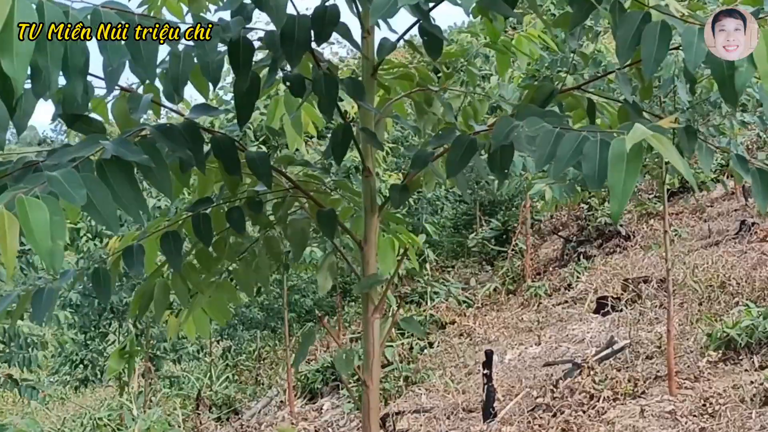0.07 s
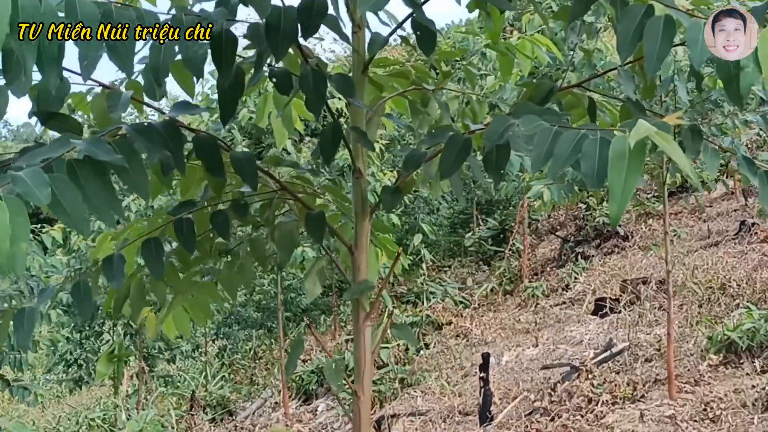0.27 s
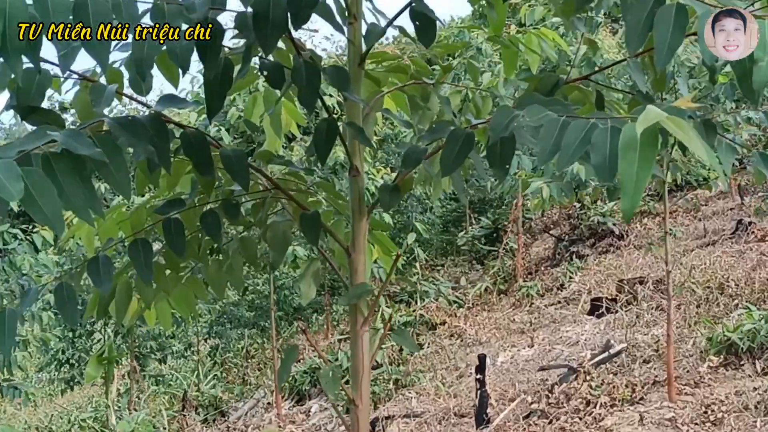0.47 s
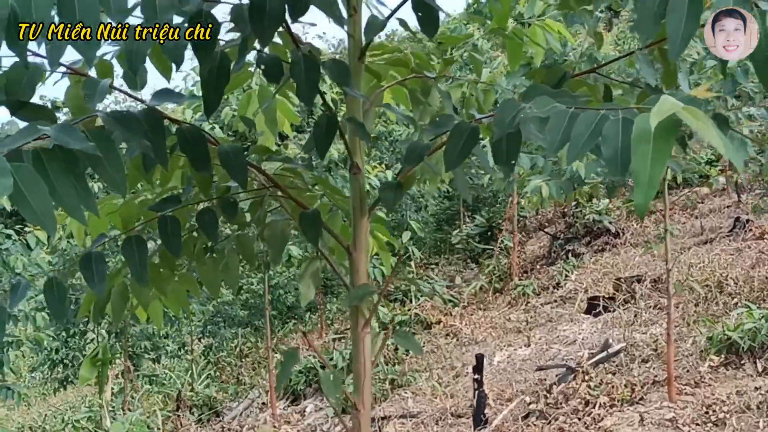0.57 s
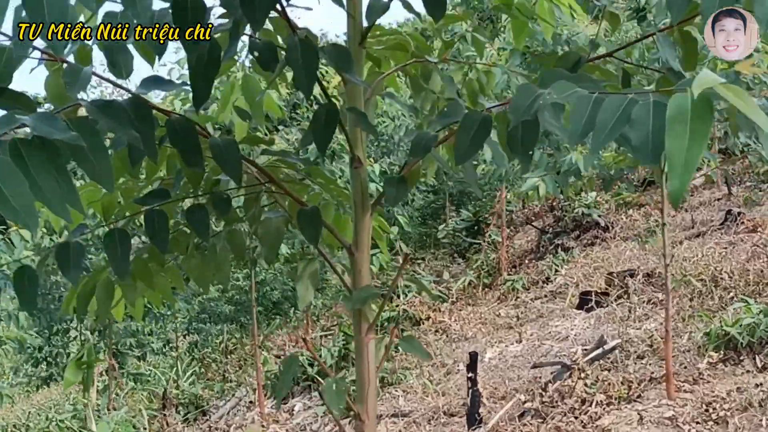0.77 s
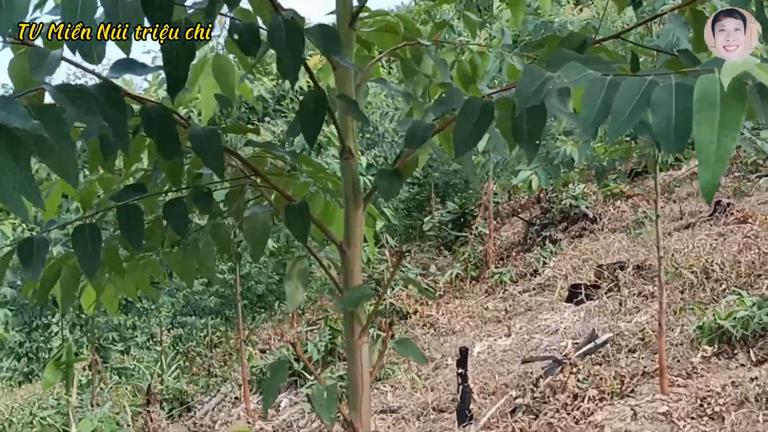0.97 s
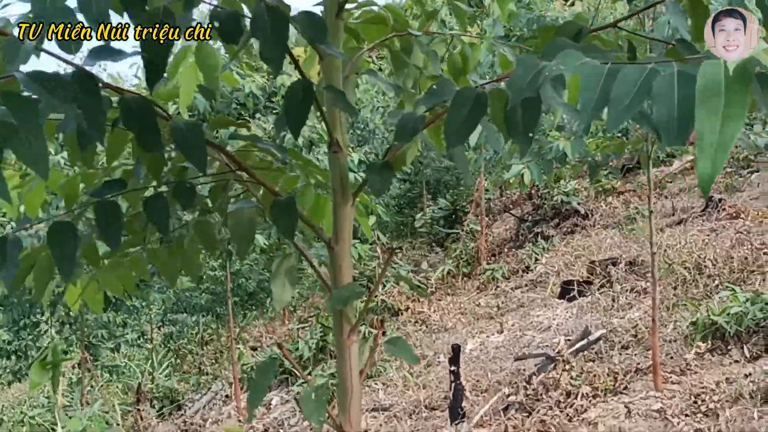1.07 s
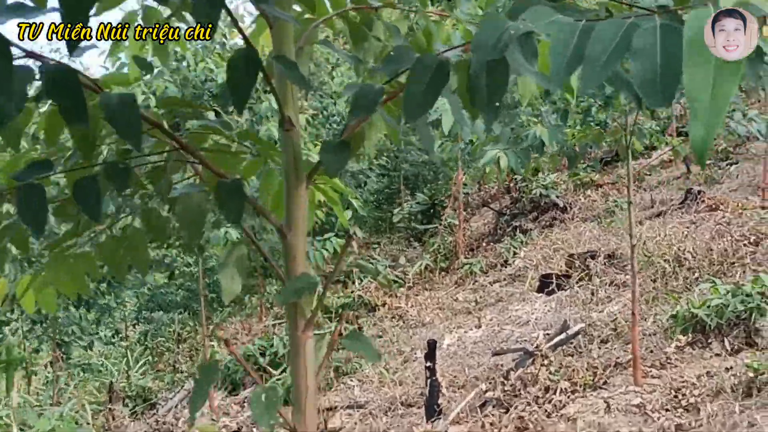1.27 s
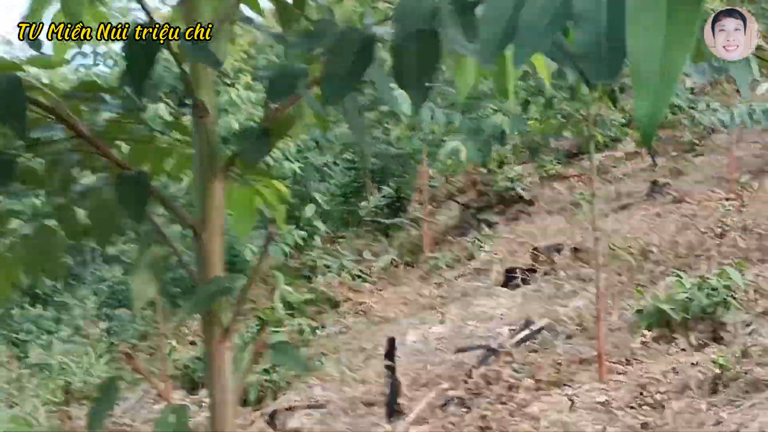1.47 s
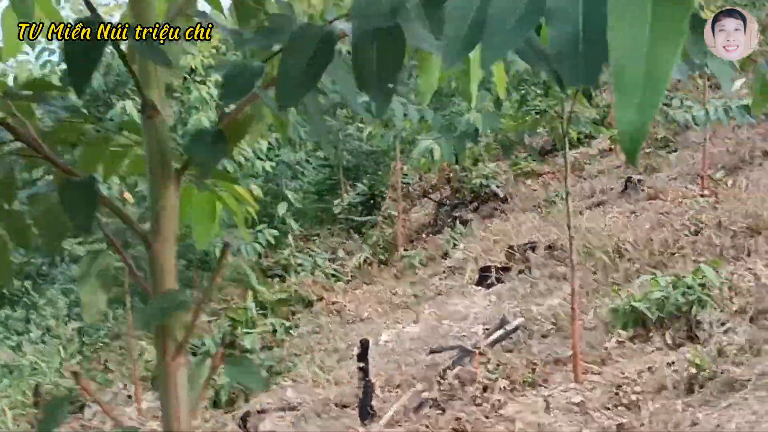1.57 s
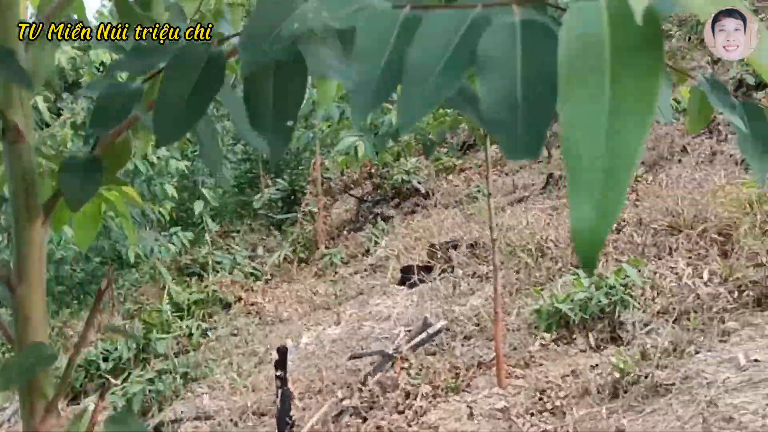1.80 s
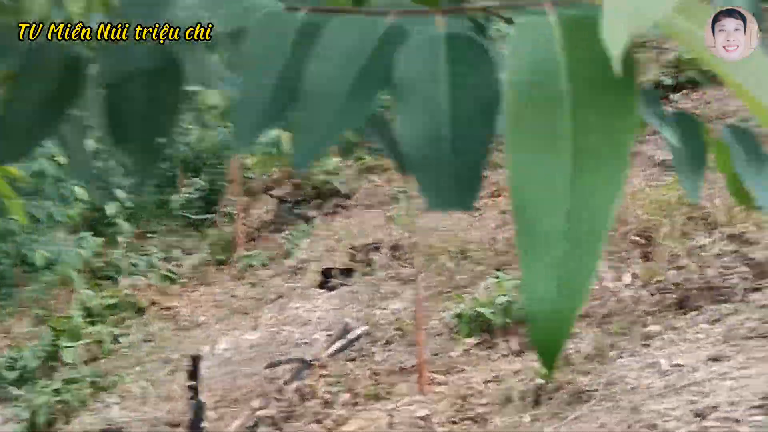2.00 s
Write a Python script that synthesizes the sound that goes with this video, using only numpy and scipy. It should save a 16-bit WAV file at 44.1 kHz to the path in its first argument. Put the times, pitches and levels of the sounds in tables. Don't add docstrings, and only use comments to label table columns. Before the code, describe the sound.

Crisp leaf litter crackles and thin twigs knock and snap under a slow step, close and loud; before it, only low wind buffeting on the microphone, faint air over leaves and far birdsong outdoors.

```python
import sys
import numpy as np
from scipy import signal
from scipy.fft import rfft, irfft, next_fast_len
from scipy.io import wavfile
from scipy.ndimage import uniform_filter1d, map_coordinates

SR = 44100
rng = np.random.default_rng(int(sys.argv[2]) if len(sys.argv) > 2 else 0)


def int16_out(signal):
    q = np.round(np.clip(np.atleast_2d(signal).T, -1, 1) * 32767)
    wavfile.write(sys.argv[1], SR, q.astype(np.int16))


def gain_from_db(level_db):
    decades = np.asarray(level_db, float) / 20
    return 10 ** decades


N = 90008


def unit(x):
    return x / np.sqrt(np.mean(x ** 2) + 1e-20)


def along(points, hz):
    f, v = np.transpose(points)
    return np.interp(np.log(hz + 1), np.log(f + 1), v)


def over_time(points):
    return np.interp(np.arange(N) / SR, *np.transpose(points))


def wobble(rate_hz):
    knots = rng.standard_normal(int(N * rate_hz / SR) + 4)
    return map_coordinates(knots, [np.arange(N) * rate_hz / SR])


def filtered(x, response):
    m = next_fast_len(len(x) + 8192)
    return irfft(rfft(x, m) * response(np.fft.rfftfreq(m, 1 / SR)), m)[:len(x)]


def resonance(hz, q):
    return lambda f: 1j * f * hz / q / (hz * hz - f * f + 1j * f * hz / q)


def high_pass(corner_hz, order):
    return lambda f: (1j * f / (corner_hz + 1j * f)) ** order


def add(out, start_s, x):
    i = round(start_s * SR)
    out[i:i + len(x)] += x[:len(out) - i]


def rings(table, crack_db, tail_db, rough, soft):
    out, t = np.zeros(N), np.arange(SR // 6) / SR
    for start_s, peak_db, hz, ms in table:
        crack_noise, tail_noise, drift_noise = rng.standard_normal((3, len(t)))
        u = t / (ms / 2000)
        drift = rough * np.cumsum(drift_noise) * np.sqrt(hz / SR)
        ring = (u * np.exp(1 - u)) ** soft * np.sin(2 * np.pi * hz * t + drift)
        crack = unit(filtered(crack_noise, resonance(1.12 * hz, 0.7)))
        crack = gain_from_db(crack_db) * u * np.exp(1 - 0.97 * u) * crack
        tail = unit(filtered(tail_noise, resonance(hz, 1.45)))
        tail = gain_from_db(tail_db - 8.0 * t / 0.00694) * tail
        add(out, start_s, gain_from_db(peak_db) * (ring + crack + tail))
    return out


# (t/s, level/dB)
BREEZE = [
    (0, 3.8),
    (.35, 0.7),
    (.65, 3),
    (.78, -1.5),
    (1.15, -0.1),
    (1.7, 1.5),
    (1.85, -1.5),
]


def breeze_db():
    return over_time(BREEZE)


# (f/Hz, level/dB)
AIR = [(20, 8), (100, -7.5), (250, -10), (420, -4), (800, -14.5), (5400, -14), (8000, -24.5),
       (14700, -20.5)]


def slope_hiss():
    z = signal.stft(rng.standard_normal(N + 512), nperseg=512)[2]
    patches = uniform_filter1d(rng.standard_normal(z.shape), 6, 0)
    patches = unit(uniform_filter1d(patches, 10, 1))
    hiss = signal.istft(z * gain_from_db(1.7 * patches), nperseg=512)[1][:N]
    hiss = unit(filtered(hiss, lambda f: gain_from_db(along(AIR, f))))
    sway_db = 0.6 * wobble(9.5)
    return gain_from_db(-57 + breeze_db() + sway_db) * hiss


def wind_rumble():
    rumble = unit(filtered(rng.standard_normal(N), lambda f: resonance(70.7, 1.1)(f) ** 2))
    lumps_db = 3.5 * wobble(11.9)
    return gain_from_db(-67.5 + breeze_db() + lumps_db) * rumble


# (t/s, peak level/dB, ring f/Hz, length/ms)
THUMPS = [(.29, -46, 49, 20), (.503, -44.5, 190, 8.8), (.61, -43, 96, 22), (.665, -41, 67, 33),
          (.714, -28.5, 79.7, 14.5), (.87, -43, 80, 9.5), (.925, -37, 96.4, 38), (.985, -43, 61.5, 31),
          (1.06, -37.5, 63.8, 43), (1.2, -48, 76, 40), (1.345, -38, 135, 17.5), (1.41, -42, 64, 20),
          (1.82, -50, 89.5, 43), (1.99, -45, 59.5, 22), (.775, -47.5, 70.4, 13), (1.175, -50.5, 120, 11),
          (1.862, -46.5, 148, 12), (1.9, -48.5, 81, 23)]


def wind_thumps():
    return rings(THUMPS, crack_db=-60, tail_db=-60, rough=0.67, soft=1.68)


# (t/s, level/dB, pitch f/Hz, length/ms)
NOTES = [(0.178, -56, 4464, 27), (.25, -61, 4230, 73), (0.291, -53, 4069, 52), (.348, -49, 3770, 29),
         (.382, -55, 3596, 25), (.415, -63, 3270, 50), (0.706, -56.5, 4400, 63), (.772, -63, 4250, 59),
         (.82, -56.5, 4050, 46), (0.876, -55, 3790, 30.1), (.908, -60.5, 3600, 39),
         (1.135, -62.5, 4170, 55)]


def bird():
    sag_hz_per_s, trill_hz, trill_depth = 2100, 95, 0.45
    echo_db, echo_t60_s = -5.5, 0.17
    out = np.zeros(N)
    for start_s, level_db, hz, ms in NOTES:
        t = np.arange(round(ms * SR / 1000)) / SR
        beat = (trill_hz * t) % 1
        shape = np.abs(np.sin(np.pi * t / t[-1])) ** 0.69
        shape = shape * (1 - trill_depth * np.cos(2 * np.pi * beat))
        pitch_hz = hz - sag_hz_per_s * (t - t[-1] / 2) + 420 * np.exp(-10 * beat)
        husk = 0.028 * np.cumsum(rng.standard_normal(len(t)))
        whistle = np.sin(2 * np.pi * np.cumsum(pitch_hz) / SR + husk)
        breath = unit(filtered(rng.standard_normal(len(t)), resonance(hz + 550, 7.3)))
        add(out, start_s, 1.3 * gain_from_db(level_db) * shape * (whistle + gain_from_db(-10) * breath))
    t = np.arange(SR // 3) / SR
    echo = rng.standard_normal(len(t)) * gain_from_db(-60 * t / echo_t60_s)
    return out + gain_from_db(echo_db) * signal.fftconvolve(out, echo / np.linalg.norm(echo))[:N]


def crackle(grain_share):
    grains_per_s, grain_db, ribs_per_s, rib_db = 850, 3.2, 350, -7
    out, flurry = np.zeros(N), gain_from_db(2.2 * wobble(220))
    for hz in np.geomspace(1200, 14500, num=16):
        hit, size, sign = rng.random((3, N))
        height = np.minimum((1 - size) ** (-grain_db / 20 * np.log(10)), 5)
        clicks = (hit < grains_per_s / SR) * height * np.sign(sign - 0.5)
        clumps = gain_from_db(2.5 * wobble(60))
        out += np.sqrt(hz) * unit(filtered(clicks * flurry * clumps, resonance(hz, 9)))
    ribs = (rng.random(N) < ribs_per_s / SR) * rng.standard_normal(N)
    grains = unit(unit(out) + gain_from_db(rib_db) * unit(ribs))
    return np.sqrt(grain_share) * grains + np.sqrt(1 - grain_share) * rng.standard_normal(N)


# (f/Hz, level/dB)
LITTER = [(200, -17), (900, -1.5), (2000, 0), (3000, -1), (4300, 4), (6700, 3.5), (9000, -1), (15500, 0)]
# (t/s, crackle level/dB, brightness/dB)
WEIGHT = [(1.194, -65, 5), (1.197, -34, 2.5), (1.225, -48.5, 15), (1.255, -39.5, 5), (1.3, -33, 4),
          (1.34, -32, 3), (1.4, -46.5, 12.5), (1.445, -35, 2.5), (1.5, -39.5, -1), (1.547, -27.5, -1.5),
          (1.618, -34.5, 2), (1.663, -50, 2), (1.703, -28.5, -4), (1.76, -34, 3.5), (1.86, -42.5, 1),
          (1.926, -47, -7), (1.945, -39.5, 5.5), (2.04, -38, 0.5)]


def litter_bed():
    s, level_db, bright_db = np.transpose(WEIGHT)
    t = np.arange(N) / SR
    bed = unit(filtered(crackle(0.78), lambda f: gain_from_db(along(LITTER, f))))
    high = filtered(bed, lambda f: 1 / (1 + (7500 / (f + 1)) ** 8))
    bed = bed + (gain_from_db(np.interp(t, s, bright_db)) - 1) * high
    uneven_db = 0.66 * wobble(140) + 0.83 * wobble(29.655)
    return gain_from_db(np.interp(t, s, level_db, left=-150) + uneven_db) * bed


# (t/s, level/dB, centre f/Hz, length/ms)
CRUSHES = [(.641, -41.5, 6840, 10.5), (1.94, -51, 2160, 37), (1.212, -30, 12000, 10),
           (1.214, -30, 5570, 16), (1.408, -40.5, 1550, 47), (1.301, -36, 7800, 8.2),
           (1.311, -38, 12000, 3.8), (1.325, -26, 6500, 6.9), (1.348, -25, 4400, 33),
           (1.389, -23.5, 4600, 5.5), (1.449, -23, 6100, 4.6), (1.459, -22.5, 4230, 4.4),
           (1.476, -32, 5900, 11), (1.512, -34.5, 494, 37), (1.697, -21, 5750, 6.3), (1.716, -33, 5950, 10),
           (1.868, -31.5, 6540, 25), (1.872, -27.5, 14300, 25), (1.835, -27.5, 15000, 12.4),
           (.6, -56, 490, 51), (.85, -61, 430, 230)]


def leaf_crushes():
    out, source = np.zeros(N), crackle(0.4)
    for k, (start_s, level_db, hz, ms) in enumerate(CRUSHES):
        u = np.arange(SR // 5) / SR / (ms / 1000)
        piece = source[k * 3000:][:len(u)]
        piece = unit(filtered(piece, lambda f: resonance(hz, 1.3)(f) ** 2))
        add(out, start_s, gain_from_db(level_db) * piece * np.minimum(u * 8, 1) / (1 + u ** 3))
    return out


# (t/s, peak level/dB, ring f/Hz, length/ms)
TICKS = [(1.1975, -22.5, 5600, 1.96), (1.2045, -26, 6200, 2.9), (1.2615, -30.5, 6620, 3.36),
         (1.279, -38, 2500, 3.4), (1.29, -25, 14600, 2), (1.3035, -27.5, 4500, 1.52),
         (1.3125, -24, 6700, 1.6), (1.327, -24.5, 3340, 2.4), (1.41, -33.5, 1610, 1.7),
         (1.423, -27, 5060, 0.87), (1.434, -30, 1800, 1), (1.5222, -24, 3450, 1), (1.557, -27, 5580, 1.3),
         (1.591, -19.5, 4380, 0.94), (1.635, -31, 4630, 0.93), (1.651, -35.5, 4400, 5.2),
         (1.675, -28.5, 3120, 1.3), (1.6932, -12.5, 10300, 0.43), (1.7805, -24, 4500, 0.5),
         (1.782, -31, 2320, 1.7), (1.7615, -29, 2200, 0.47), (1.814, -35, 2110, 1.5),
         (1.827, -36, 2040, 1.55), (1.849, -29.5, 5600, 1.1), (1.942, -37, 2210, 2.7),
         (1.963, -33, 6100, 1.45), (1.969, -36, 1950, 1.4), (1.978, -42.5, 2120, 1.9),
         (1.985, -30, 2070, 1.3), (1.984, -32.5, 6800, 1.8), (1.994, -30, 1350, 0.68),
         (2.003, -29, 6500, 1.08), (2.02, -35.5, 3190, 10), (2.038, -31, 6070, 1.7), (.569, -48, 1490, 1.1),
         (.634, -45, 1510, 1.13), (.742, -52, 6000, 1.2), (.76, -50, 1900, 0.75), (.835, -52, 2000, .6),
         (.848, -46.5, 596, 1.7)]


def rib_ticks():
    return rings(TICKS, crack_db=-6, tail_db=-26, rough=0.67, soft=1.0)


# (t/s, peak level/dB, ring f/Hz, length/ms)
KNOCKS = [(1.3485, -7.5, 411, 3.56), (1.3505, -15, 1213, 4.5), (1.3565, -18.5, 1670, 2.1),
          (1.357, -18.5, 555, 3.6), (1.361, -22.5, 1132, 2), (1.364, -13.5, 1293, 2.16),
          (1.379, -19, 1020, 1.3), (1.365, -16, 491, 7.1), (1.3705, -8, 1540, 1.37),
          (1.376, -13.5, 1277, 1.5), (1.3838, -9, 1760, 1.66), (1.4543, -5, 1460, 0.76),
          (1.4715, -21, 860, 1.19), (1.472, -19.5, 1720, 1.38), (1.4755, -3.5, 616, 0.26),
          (1.509, -11, 651, 1.3), (1.5235, -11.5, 790, 0.93), (1.524, -14, 1450, 1.03),
          (1.5095, -18.5, 1230, 1.7), (1.68, -27, 446, 4), (1.6925, -26, 1617, 3.5), (1.693, -20, 503, 2.4),
          (1.713, -26.5, 1060, 2.7), (1.7945, -22.5, 2050, 0.46), (1.8425, -17, 1940, 0.44),
          (.506, -35.5, 430, 1.7), (.567, -40, 516, 2.2), (.716, -35, 390, 0.66), (.72, -40, 1560, 1)]


def twig_knocks():
    return rings(KNOCKS, crack_db=-17, tail_db=-18.5, rough=0.36, soft=0.73)


# (t/s, peak level/dB, ring f/Hz, length/ms)
SNAPS = [(1.209, -12.5, 12740, 3.8), (1.2095, -18.5, 6185, 3.77), (1.379, -13.5, 6700, 0.7),
         (1.3845, -10.5, 7280, 1.05), (1.3838, -6.5, 4060, 1.5), (1.3842, -10, 5580, 1.04),
         (1.4545, -7, 4070, 1.253), (1.4715, -16, 3490, 0.86), (1.4755, -15, 2950, 0.86),
         (1.543, -30, 5520, 1.1), (1.6015, -18, 3430, 1.5), (1.6715, -15.5, 3840, 0.9),
         (1.6927, 3, 5260, 0.35), (1.7065, -7.5, 4230, 1.2), (1.7125, -10, 4350, 1.7),
         (1.744, -29, 5300, 0.59), (1.7615, -22, 5500, 1.17), (1.7945, -17.5, 5030, 0.68),
         (1.8428, -15.5, 5200, 0.4), (1.877, -19.5, 5700, 1.6), (.76, -39, 8450, 0.32),
         (.817, -39, 11940, 0.99), (1.024, -45, 2830, 0.545)]


def twig_snaps():
    return rings(SNAPS, crack_db=-11.5, tail_db=-20, rough=0.5, soft=1.7)


def footstep():
    step = litter_bed() + leaf_crushes() + rib_ticks() + twig_knocks() + twig_snaps()
    return filtered(step, high_pass(266, 4))


def scene():
    wind = slope_hiss() + wind_rumble() + wind_thumps()
    return (wind + bird() + footstep())[None]


def top_cut(x):
    return signal.sosfilt(signal.butter(12, 16630, fs=SR, output="sos"), x)


# (f/Hz, level/dB)
MIC = [(2300, 0), (3200, -1.33), (5400, -1), (6100, -.5), (6800, 1), (7600, -7), (10500, -2.5), (15300, 1)]


def record(dry):
    low_cut = high_pass(27.3, 2)
    x = filtered(dry[0], lambda f: gain_from_db(along(MIC, f)) * low_cut(f))
    x = x / (1 + np.abs(x / 0.9) ** 8) ** (1 / 8)
    mix = filtered(x, lambda f: gain_from_db(np.interp(f, [15450, 15750], [0, -48])) * (f < 16600))
    return top_cut(mix)


dry = scene()
out = record(dry)
int16_out(out)
```